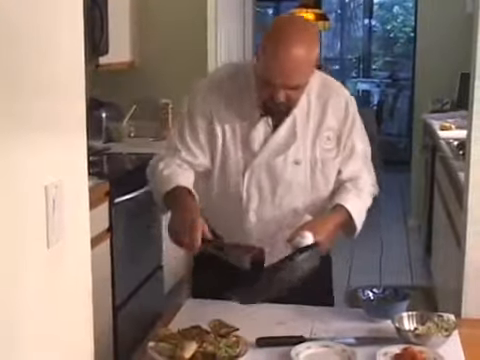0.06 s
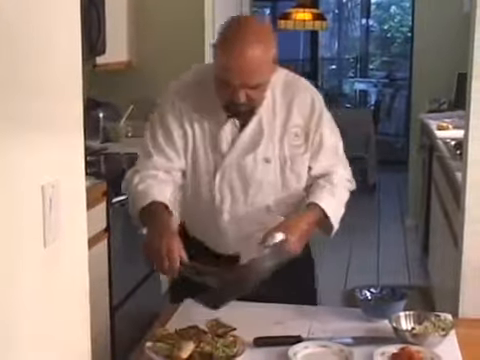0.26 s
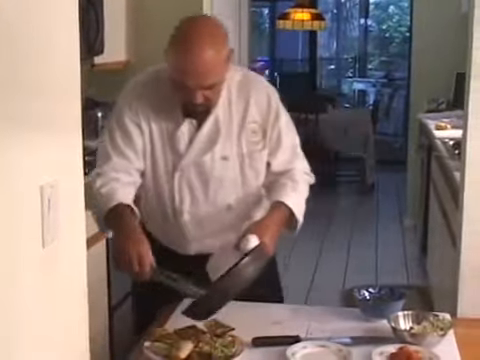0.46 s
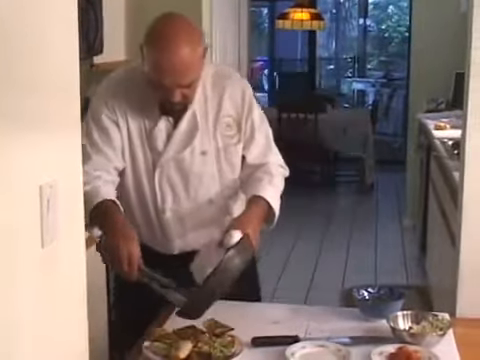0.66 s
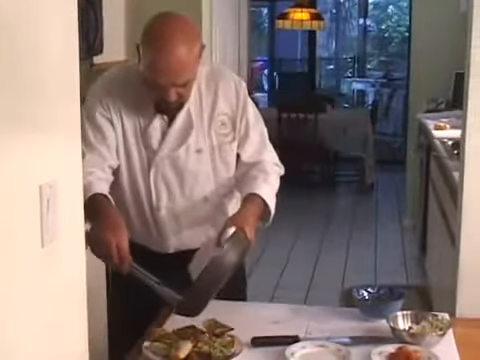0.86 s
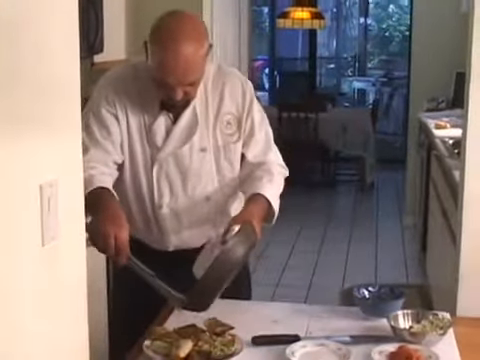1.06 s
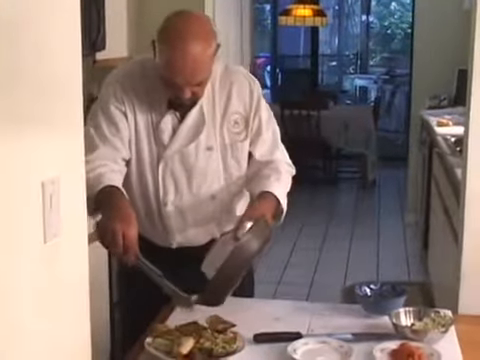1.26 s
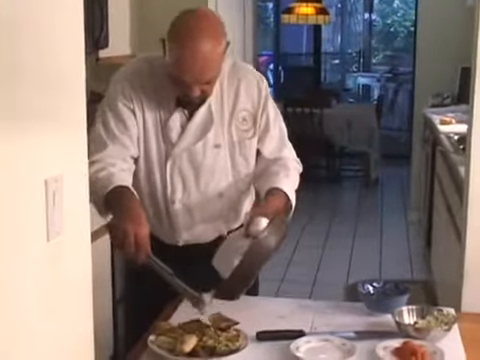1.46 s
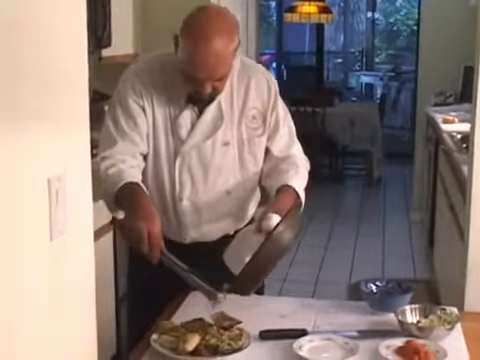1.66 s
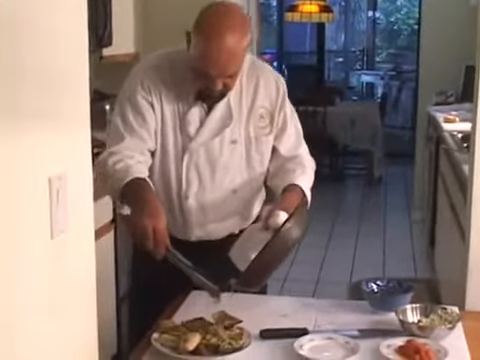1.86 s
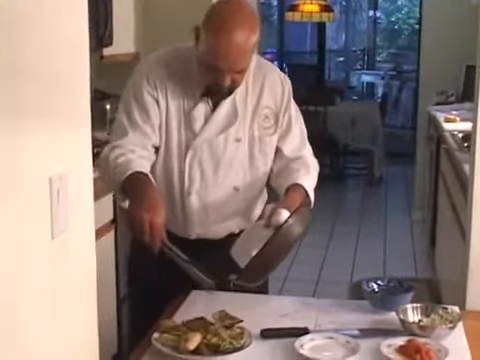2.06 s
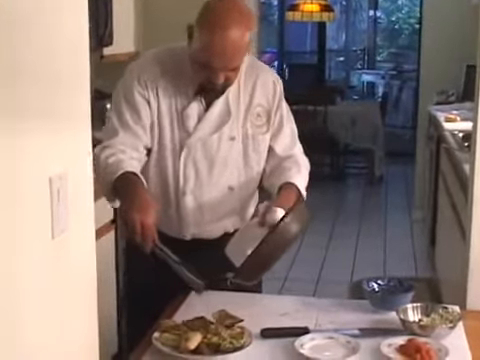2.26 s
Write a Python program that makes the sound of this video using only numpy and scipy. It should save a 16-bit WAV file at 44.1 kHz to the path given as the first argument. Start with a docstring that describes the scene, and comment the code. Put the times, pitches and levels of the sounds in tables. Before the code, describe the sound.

Metal tongs clack twice against a frying pan, then softly scrape food out.

```python
"""An appliance hums under the hiss of a small hard kitchen; food rubs faintly in a hand-held frying pan.
Steel tongs clack twice against the pan and make it ring, rebounding lightly after each clack.
They drag over the metal with short squeaks.
Then they softly push food out of the tilted pan, with small moist ticks; the pan rings faintly under it.
The kitchen walls echo the tongs, the pan and the food."""
import sys
import numpy as np
from scipy import signal
from scipy.fft import rfft, irfft, next_fast_len
from scipy.io import wavfile
from scipy.ndimage import map_coordinates

SR = 44100
rng = np.random.default_rng(int(sys.argv[2]) if len(sys.argv) > 2 else 0)


def master(y):
    """Save y as 16-bit WAV."""
    cut = np.clip(np.atleast_2d(y).T, -1, 1)
    pcm = np.round(cut * 32767)  # scale
    wavfile.write(sys.argv[1], SR, pcm.astype(np.int16))


N = 101429

# resonances of the tongs' steel arms: f/Hz, width/Hz, boost/dB
TONG_RESONANCES = [(2739, 80, 7.5), (4120, 170, 2.5), (4450, 130, 9.5), (5900, 180, 8.5), (6610, 840, 5),
                   (8060, 660, 5)]


def amp(db):
    """Turn decibels into a gain."""
    return 10 ** (np.asarray(db) / 20)


def unit(x):
    """Scale a signal to an average (rms) level of 1."""
    return x / np.sqrt(np.mean(x ** 2) + 1e-20)


def along(points, hz):
    """Read a curve of (frequency, value) points at hz, on a log frequency axis."""
    freqs, values = np.transpose(points)
    return np.interp(np.log(hz + 1), np.log(freqs + 1), values)


def boost(peaks, hz):
    """Gain of a few resonances that stand above a flat response."""
    return 1 + sum((amp(db) - 1) / (1 + (2 * (hz - centre) / width) ** 2) for centre, width, db in peaks)


def filtered(x, response):
    """Scale each frequency in x by the gain response(hz)."""
    size = next_fast_len(len(x) + SR // 4)
    return irfft(rfft(x, size) * response(np.fft.rfftfreq(size, 1 / SR)), size)[:len(x)]


def noise(spectrum, size):
    """Noise with the given spectrum and an rms level of 1."""
    return unit(filtered(rng.standard_normal(size), lambda hz: amp(along(spectrum, hz))))


def wobble(rate):
    """A smooth curve through `rate` random values a second."""
    return map_coordinates(rng.standard_normal(int(N * rate / SR) + 4), [np.arange(N) * rate / SR])


def grains(per_s, size):
    """Tiny clicks of uneven strength at random times."""
    return (rng.random(size) < per_s / SR) * rng.standard_normal(size)


def swell(size):
    """One smooth rise and fall."""
    return np.sin(np.pi * np.arange(size) / size)


def add(track, start, sound):
    """Mix a sound into the track at `start` seconds."""
    part = track[round(start * SR):][:len(sound)]
    part += sound[:len(part)]


def hum_and_hiss():
    """An appliance hums with slightly unsteady tones under the room's even hiss."""
    # tones of the appliance: f/Hz, level/dB
    hum_tones = [(59.5, -86.5), (118.8, -74), (156, -80.5), (197, -80), (362, -90.5), (3060, -86.5)]
    # spectrum of the hiss: f/Hz, relative level/dB
    hiss_spectrum = [(15, -37), (25, 0.5), (124, -7.5), (267, -6.5), (297, -17), (349, -7.5), (420, -10),
                     (594, -12.5), (661, -29.5), (862, -10.5), (1820, -17.5), (8290, -26), (14500, -28.5)]
    hiss_db = -69.5
    t = np.arange(N) / SR
    hum = sum(amp(db) * np.sqrt(2) * np.sin(2 * np.pi * hz * t + .4 * wobble(2.2))
              for hz, db in hum_tones)
    return hum + amp(hiss_db) * noise(hiss_spectrum, N)


def sliding_food():
    """Food rubs along the pan, stirring its main resonance, with a moist crackle."""
    # loudness of the sliding: t/s, level/dB
    slide_levels = [(0, -76.5), (.2, -69.5), (.55, -71.5), (1.0, -71.5), (1.199, -72.5), (1.399, -70),
                    (1.56, -69.5), (1.68, -75), (1.82, -69), (1.97, -69), (2.03, -68.5), (2.08, -70.5),
                    (2.139, -71.5), (2.3, -71.5)]
    # spectrum of the rubbing: f/Hz, relative level/dB
    rub_spectrum = [(150, -2), (400, 2.5), (700, 1.5), (1000, 3), (1300, -8), (2000, -4.5), (3200, -10),
                    (5000, -11), (9000, -29), (14000, -39.5)]
    # the pan's main resonance under the food: f/Hz, width/Hz, boost/dB
    pan_resonance = [(950, 140, 1)]
    # spectrum of the crackle: f/Hz, relative level/dB
    crackle_spectrum = [(500, 10), (2000, 10.5), (4500, 3.5), (10000, 3), (14000, -9.5)]
    crackle_db = -9.5  # relative to the rubbing
    level_db = np.interp(np.arange(N) / SR, *np.transpose(slide_levels))
    rub = unit(filtered(noise(rub_spectrum, N), lambda hz: boost(pan_resonance, hz)))
    rub *= amp(1.5 * wobble(40))  # the level flickers
    crackle = unit(filtered(grains(per_s=430, size=N), lambda hz: amp(along(crackle_spectrum, hz))))
    return amp(level_db) * (rub + amp(crackle_db) * crackle)


def pan_ring(t, spot, stretch, cutoff_hz=SR):
    """The struck pan rings with many fading tones; a soft touch misses those above the cutoff."""
    # the pan's tones: f/Hz, time to fade 60 dB/s, level at spot 0/dB, level at spot 1/dB
    pan_tones = [(375, 0.063, -41.5, -12), (491, 0.023, -21, -38), (873.4, 0.16, -23.5, -22),
                 (969, 0.046, 4, 7), (1040, 0.047, -32.5, 0), (1268, 0.067, -24.5, -16),
                 (1597, 0.1, -23, -8), (1654, 0.065, -12, -7.5), (1819, .045, -2, -18.5),
                 (1903, 0.11, -17.5, -15), (2138, 0.062, -17, -32), (2754, 0.04, -19, -11.5),
                 (3315, 0.079, -18, -26), (3372, 0.039, -15, -50), (4110, 0.055, -26.5, -19),
                 (4420, 0.21, -43, -43.5), (5850, 0.045, -43, -22)]
    rise_s = 0.0026
    ring = np.zeros(len(t))
    for hz, fade_s, spot0_db, spot1_db in pan_tones:
        level_db = spot0_db + spot * (spot1_db - spot0_db)
        envelope = amp(level_db - 60 * t / (fade_s * stretch))
        ring += envelope * np.sin(2 * np.pi * hz * t) / (1 + (hz / cutoff_hz) ** 4)
    return ring * (1 - np.exp(-t / rise_s))


def clacks():
    """Each blow of the tongs rings the pan under a brief crack of steel; light rebounds follow."""
    # blows (the first three merge into one clack):
    # t/s, ring gain/dB, crack gain/dB, spot on the pan (0 to 1), factor on the ring time
    blows = [(0.2383, -35, -30, 1, 0.37), (0.2421, -11.5, -22.5, 0, .85), (0.253, -13.5, -40, 0.44, 0.58),
             (.645, -18, -30, 0.84, 0.54)]
    # spectrum of the crack near spot 0: f/Hz, relative level/dB
    crack_at_spot0 = [(100, -23.5), (600, -1), (1400, -1.5), (2500, 0), (3700, -9), (5200, -12),
                      (7500, -15), (9500, -20.5), (14000, -27)]
    # spectrum of the crack near spot 1: f/Hz, relative level/dB
    crack_at_spot1 = [(100, -25), (450, -6.5), (650, 1), (1400, -13), (2500, 11), (3700, -1), (5200, -7.5),
                      (7500, -8), (9500, -10.5), (14000, -14)]
    # soft rebounds that stir mainly the low tones: t/s, gain/dB
    rebounds = [(0.301, -31), (0.3713, -31), (.412, -40), (0.435, -41.5), (.68, -35), (.7025, -36.5),
                (0.755, -44)]
    rise_s, fade_s, lag_s = 0.0026, 0.038, 0.00119  # the steel bites just after the first touch
    out, t = np.zeros(N), np.arange(SR // 4) / SR
    for start, ring_db, crack_db, spot, stretch in blows:
        crack = noise(crack_at_spot1 if spot > .5 else crack_at_spot0, len(t))
        crack = unit(filtered(crack, lambda hz: boost(TONG_RESONANCES, hz)))
        crack *= (1 - np.exp(-t / rise_s)) * amp(-60 * t / fade_s)
        add(out, start, amp(ring_db) * pan_ring(t, spot, stretch))
        add(out, start + lag_s, amp(crack_db) * crack)
    for start, db in rebounds:
        add(out, start, amp(db) * pan_ring(t, spot=0, stretch=1.14, cutoff_hz=1300))
    return out


def thump():
    """The hard first clack shoves the whole pan: one low push without any ring."""
    start, level_db, rise_s = .2442, -22.5, 0.00049
    progress = np.maximum(np.arange(N) / SR - start, 0) / rise_s
    push = amp(level_db) * progress * np.exp(1 - progress)
    return signal.sosfilt(signal.butter(1, 60, "high", fs=SR, output="sos"), push)


def scrapes():
    """Steel drags over the pan: thousands of tiny clicks a second blur into a gritty hiss."""
    # strokes of the tongs: t/s, length/s, level/dB, tilt toward the treble/(dB per octave)
    strokes = [(0.355, 0.072, -52, -4.5), (0.559, 0.036, -64, 4.5), (0.759, .11, -59, -4),
               (0.836, 0.08, -62.5, -0.5), (0.899, 0.093, -68, 1.5), (1.297, 0.026, -72.5, -4),
               (1.34, 0.38, -78.5, -4), (1.819, 0.16, -73.5, 2)]
    # spectrum of the scraping: f/Hz, relative level/dB
    scrape_spectrum = [(300, -20.5), (1000, 2.5), (2500, -3.5), (4300, -4), (6500, -7.5), (9000, -12.5),
                       (14000, -14.5)]
    out = np.zeros(N)
    for start, length, db, tilt in strokes:
        def colour(hz):
            colour_db = along(scrape_spectrum, hz) + tilt * np.log2((hz + 100) / 3000)
            return boost(TONG_RESONANCES, hz) * amp(colour_db)
        size = int(length * SR)
        grit = filtered(grains(per_s=5000, size=size), colour)
        add(out, start, amp(db) * unit(grit) * swell(size))
    return out


def squeaks_and_faint_rings():
    """Narrow bands of sound: the tongs squeak, and later the pan rings faintly as the food slides."""
    # squeaks and faint rings: t/s, length/s, level/dB, f/Hz, width/Hz
    narrow_bands = [(.37, 0.047, -45, 997, 40), (.376, 0.014, -60, 5600, 120),
                    (0.382, 0.031, -63, 4160, 110), (0.393, 0.03, -43.5, 1810, 60.6),
                    (0.57, .03, -69.5, 4980, 300), (0.704, 0.051, -60.5, 6130, 900),
                    (0.743, .04, -54.5, 865, 304), (0.823, 0.052, -55.5, 1860, 240),
                    (0.846, 0.057, -53, 1930, 57), (0.949, 0.033, -66.5, 1890, 80),
                    (1.38, 0.14, -75.5, 1010, 130), (1.545, .08, -73, 1750, 110.5),
                    (1.778, 0.068, -68, 1005, 110), (1.865, 0.17, -70.5, 1010, 90),
                    (2.056, .045, -68.5, 1020, 110)]
    out = np.zeros(N)
    for start, length, db, pitch_hz, width_hz in narrow_bands:
        size = int(length * SR)
        hiss = rng.standard_normal(size)
        tone = filtered(hiss, lambda hz: 1 / (1 + (2 * (hz - pitch_hz) / width_hz) ** 2))
        tone /= np.abs(signal.hilbert(tone)) ** .5  # evens out the loudness
        add(out, start, amp(db) * unit(tone) * swell(size))
    return out


def ticks():
    """Tiny touches of tongs and food, each a quick puff of noise with its own brightness."""
    # touches: t/s, peak level/dB, centre f/Hz
    touches = [(0.6005, -52, 8600), (1.1197, -51.5, 5560), (1.189, -58, 2500), (1.302, -58, 4040),
               (1.442, -59.5, 9000), (1.705, -58, 4280), (1.766, -55, 2100), (1.797, -59, 2780),
               (1.865, -58, 2600), (1.905, -60, 5100), (2.026, -55.5, 7000), (2.031, -63, 5000),
               (2.206, -54.5, 8000), (2.29, -56.5, 9000)]
    fade_s, width_octaves = 0.016, 0.5
    out, t = np.zeros(N), np.arange(SR // 20) / SR
    for start, db, centre_hz in touches:
        hiss = rng.standard_normal(len(t))
        tick = filtered(hiss, lambda hz: np.exp(-.5 * (np.log2((hz + 1) / centre_hz) / width_octaves) ** 2))
        tick *= amp(-60 * t / fade_s)
        add(out, start, amp(db) * tick / np.abs(tick).max())
    return out


def kitchen_echo(x):
    """Hard walls send back a few clear echoes and a blurred tail that fades away."""
    # echoes from near walls: delay/s, level/dB
    wall_echoes = [(.0118, -21), (.0305, -34), (.0385, -27), (0.061, -38)]
    # how long the room rings: f/Hz, time to fade 60 dB/s
    fade_times = [(150, 0.52), (1000, 0.47), (1800, 0.45), (3000, 0.4), (7000, 0.48), (14000, 0.43)]
    # spectrum of the tail: f/Hz, gain/dB
    tail_spectrum = [(100, -36.5), (400, -8.5), (650, -7.5), (1000, -14.5), (1800, -12), (3000, -5),
                     (7000, -6.5), (14000, -4)]
    rise_s = .005
    freqs, t, bands = signal.stft(rng.standard_normal(SR * 3 // 4), SR, nperseg=256)
    bands *= amp(-60 * t / along(fade_times, freqs)[:, None])
    _, tail = signal.istft(bands, SR, nperseg=256)
    tail = filtered(tail / np.linalg.norm(tail), lambda hz: amp(along(tail_spectrum, hz)))
    tail *= 1 - np.exp(-np.arange(len(tail)) / SR / rise_s)
    for delay, db in wall_echoes:
        add(tail, delay, amp([db]))
    return signal.fftconvolve(x, tail)[:N]


def scene():
    """Tongs, pan and food with their echo, over the hum and hiss, in one channel."""
    direct = clacks() + thump() + scrapes() + squeaks_and_faint_rings() + ticks() + sliding_food()
    return (direct + kitchen_echo(direct) + hum_and_hiss())[None]


def record(dry):
    """Cut away the very highest treble."""
    top_hz, edge_hz = 14450, 900
    return np.array([filtered(x, lambda hz: np.clip((top_hz - hz) / edge_hz + .5, 0, 1)) for x in dry])


dry = scene()
out = record(dry)
master(out)
```